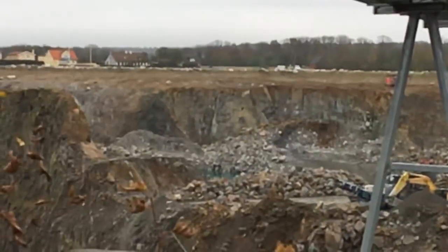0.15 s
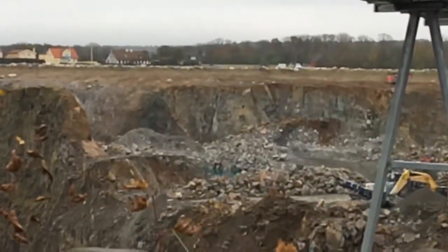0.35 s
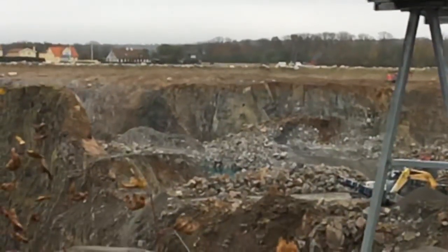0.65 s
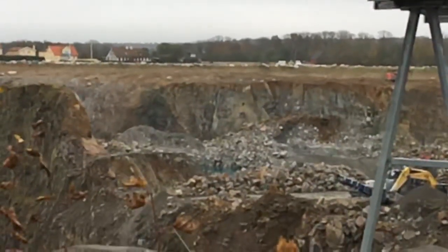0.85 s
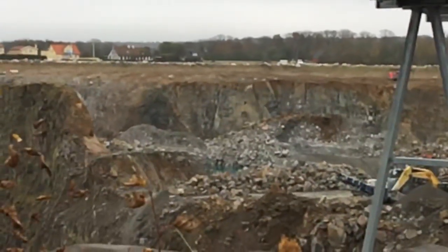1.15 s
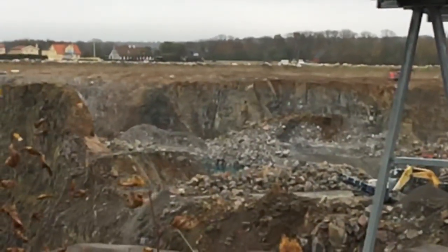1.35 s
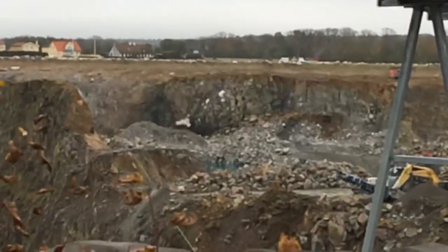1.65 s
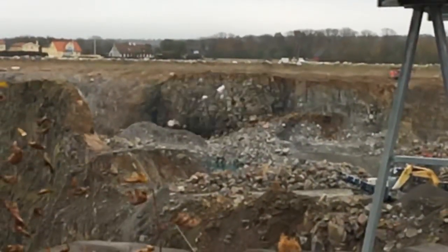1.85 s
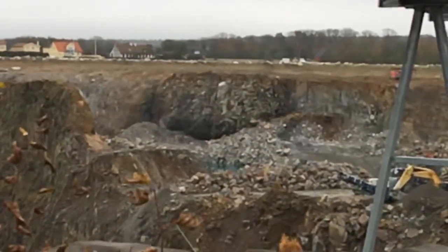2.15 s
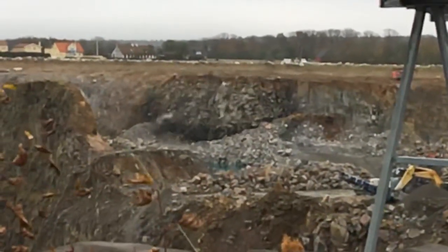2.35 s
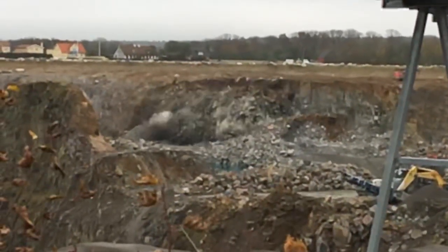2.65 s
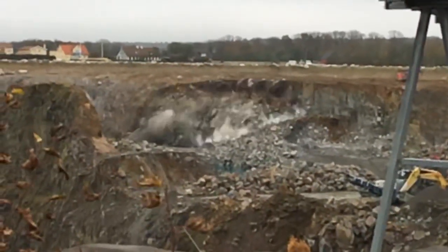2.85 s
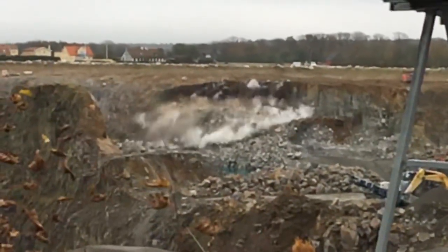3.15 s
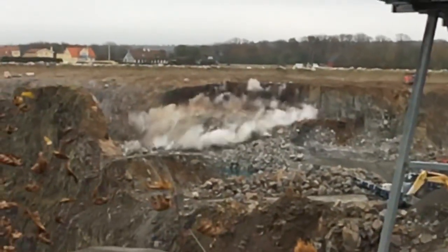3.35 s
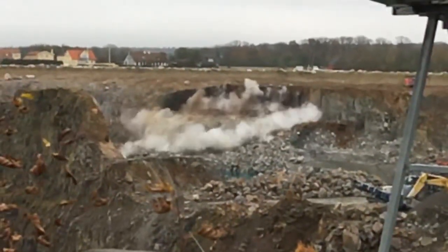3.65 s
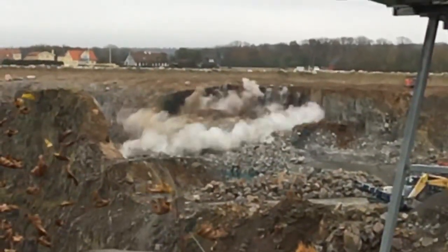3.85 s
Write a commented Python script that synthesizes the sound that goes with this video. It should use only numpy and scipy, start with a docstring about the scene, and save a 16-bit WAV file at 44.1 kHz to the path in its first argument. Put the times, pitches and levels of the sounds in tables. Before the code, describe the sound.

A quarry blast cracks sharply with a deep boom and rapid ripple of delayed charges, then rock rumbles and roars down; faint plant hum and a low ground tremor come before, heard from afar outdoors.

```python
"""A quarry face is blasted in the distance while machinery hums as shaped noise and a wavering tone.
The shock comes first through the ground as a low tremor of noise. Then the air brings a sharp crack,
made of noise bursts, a pressure jump and a low boom, and a quick ripple of delayed charges.
The face slumps with a lumpy rumble and breaks into a growing roar of rock, built from many short knocks.
The recorder overloads and ducks."""
import sys
import numpy as np
from scipy import signal
from scipy.fft import rfft, irfft
from scipy.io import wavfile
from scipy.ndimage import uniform_filter1d

SR = 44100
rng = np.random.default_rng(int(sys.argv[2]) if len(sys.argv) > 2 else 0)


def transcribe(u):
    """Save the signal u as a 16-bit wav file named by the first command-line argument.

    u: samples, shape (n,) or (channels, n), limited to [-1, 1]; the rate is SR.
    q: integer samples, one column per channel.
    """
    v = np.clip(np.atleast_2d(u).T, -1, 1)
    q = np.round(v * 32767).astype(np.int16)
    wavfile.write(sys.argv[1], SR, q)


N = 176400  # samples: 4 s
T = np.arange(N) / SR  # time of each sample [s]

# the crack and its nearest reflections: (time [s], level [dB])
CRACK_ARRIVALS = [(2.3112, -2.5), (2.316, -28), (2.3301, 3), (2.339, 1.5)]


def amp(db):
    """Turns decibels into gain."""
    return 10 ** (np.asarray(db) / 20)


def unit(x):
    """Scales a sound to an average (rms) strength of 1."""
    return x / np.sqrt(np.mean(x ** 2) + 1e-20)


def level(points):
    """Gain over time from (time [s], level [dB]) points, all but silent before the first."""
    return amp(np.interp(T, *np.transpose(points), left=-120))


def colour(x, points):
    """Filters x by (frequency [Hz], level [dB]) points, with less and less below the first; rms 1."""
    f, db = np.transpose(points)
    hz = np.fft.rfftfreq(N, 1 / SR)
    gain = amp(np.interp(np.log(hz + 1), np.log(f), db))
    low_cut = np.minimum(hz / f[0], 1) ** 2
    return unit(irfft(rfft(x) * gain * low_cut, N))


def noise(points):
    """Random hiss with a given spectrum, rms 1."""
    return colour(rng.standard_normal(N), points)


def decay(start, t60, rise=1e-4):
    """A straight rise, and an exponential fade that loses 60 dB in t60 seconds."""
    age = np.maximum(T - start, 0)
    return np.minimum(age / rise, 1) * np.exp(-np.log(1000) * age / t60)


def swing(start, hz, t60, rise):
    """A pressure wave: a push, a suck and a few dying swings."""
    return decay(start, t60, rise) * np.sin(2 * np.pi * hz * (T - start))


def machinery():
    """A distant plant: a steady wash, wavering drones and one clear whine whose pitch wanders."""
    # machinery and open air: (frequency [Hz], level per Hz [dB])
    plant = [(25, -17), (55, -9.5), (110, -5), (200, -6), (260, -10.5), (350, -12.5), (490, -20.5),
             (560, -14.5), (850, -13), (1050, -15.5), (1450, -23.5), (1700, -21), (2200, -26.5),
             (2750, -31), (3300, -36.5), (4200, -40), (6200, -39.5), (7500, -44), (16000, -48.5)]
    # machine tones: (frequency [Hz], level [dB], width [Hz])
    hum = [(173.1, -44, 8.9), (211.6, -49.5, 12), (709, -48.5, 52), (864, -58.5, 26), (962, -50.5, 20),
           (1110, -55.5, 19), (1281, -57.5, 23), (1563, -54, 80)]
    plant_db = -39.5
    whine_hz, whine_db, wander_hz = 681.7, -43.5, 2.2  # the wander is an rms value
    f = np.fft.rfftfreq(N, 1 / SR)
    out = amp(plant_db) * noise(plant)
    for hz, db, width in hum:
        # a narrow band of noise sounds like a wavering tone
        band = 1 / (1 + (2 * (f - hz) / width) ** 2)
        out += amp(db) * unit(irfft(rfft(rng.standard_normal(N)) * band, N))
    pitch = whine_hz + wander_hz * noise([(2, -6), (12, -5), (100, -69)])
    whine = unit(np.sin(2 * np.pi * np.cumsum(pitch) / SR))
    return out + amp(whine_db) * whine


def tremor():
    """The ground wave outruns the sound in the air: low noise that fades slowly."""
    # ground tremor: (frequency [Hz], level per Hz [dB])
    ground = [(20, -22.5), (45, 2.5), (90, -0.5), (125, -8.5), (200, -12), (500, -71)]
    start_s, tremor_db, fade_db_per_s = 1.425, -31, 7
    return amp(tremor_db) * decay(start_s, 60 / fade_db_per_s, 0.012) * noise(ground)


def crack():
    """The crack and its reflections, scatter off the ground, and a low ringing boom beneath."""
    # small sharp snaps just ahead of the crack: (time [s], level [dB])
    snaps = [(2.288, -18.5), (2.3015, -29)]
    # colour of the crack: (frequency [Hz], level per Hz [dB])
    crack_colour = [(100, -2), (170, 13.5), (260, -2), (450, 4.5), (680, -7), (1000, 2.5), (1400, -2),
                    (2000, -18.5), (3400, -15.5), (4500, -18), (5200, -25.5), (9000, -25), (14000, -26),
                    (16000, -33)]
    # hissing tail, scattered from rubble: (frequency [Hz], level per Hz [dB])
    echo_colour = [(1200, 5), (2500, 0), (4500, -8), (9000, -13.5), (15000, -20)]
    snap_t60, crack_t60 = 0.007, .016  # s
    scatter_db, scatter_t60 = -5, 0.23  # dB, s
    echo_db, echo_t60 = -23.5, 0.64  # dB, s
    boom_s, boom_hz, boom_db, boom_t60, boom_rise_s = 2.314, 63.2, 5.5, 0.41, 0.0029
    start = CRACK_ARRIVALS[0][0]
    # the bursts share one noise, so their powers add
    power = sum((amp(db) * decay(s, snap_t60)) ** 2 for s, db in snaps)
    power += sum((amp(db) * decay(s, crack_t60)) ** 2 for s, db in CRACK_ARRIVALS)
    power += (amp(scatter_db) * decay(start, scatter_t60)) ** 2
    burst = np.sqrt(power) * noise(crack_colour)
    tail = amp(echo_db) * decay(start, echo_t60, .02) * noise(echo_colour)
    boom = amp(boom_db) * swing(boom_s, boom_hz, boom_t60, boom_rise_s)
    return burst + tail + boom


def knocks(count=12):
    """Countless stones of random size strike, each with a short ring, over a blur of smaller ones."""
    knocks_per_s, spread_db, knock_t60 = 900, 1.5, 0.022  # t60 in s
    wash_share = 0.58  # share of the power in the blur
    t, out = T[:2048], np.zeros(N)
    # each round gives its share of the stones one random ring
    for _ in range(count):
        strikes = rng.random(N) < knocks_per_s / count / SR
        size = amp(spread_db * np.minimum(rng.exponential(1, N), 4)) * strikes
        ring = rng.standard_normal(len(t)) * np.exp(-np.log(1000) * t / knock_t60)
        out += signal.oaconvolve(size, ring)[:N]
    return np.sqrt(1 - wash_share) * unit(out) + np.sqrt(wash_share) * rng.standard_normal(N)


def rockfall():
    """The face rumbles in lumps as it slumps; light stones clatter first, then the heavy mass lands."""
    # loudness of the slumping face: (time [s], level [dB])
    slump = [(2.31, -50), (2.36, -7.5), (2.62, -14), (2.72, -14), (2.86, -22.5), (2.96, -16), (3.08, -25),
             (3.22, -20.5), (3.5, -24), (3.75, -26), (4, -28)]
    # colour of the slump: (frequency [Hz], level per Hz [dB])
    rumble_colour = [(18, -19), (34, -4), (68, -0.5), (110, -4.5), (170, -6), (240, -18), (500, -20.5),
                     (1500, -78)]
    # loudness of the falling rock: (time [s], level [dB])
    falling = [(2.4, -35), (2.7, -33), (2.85, -31.5), (3.0, -28), (3.2, -25.5), (3.45, -22), (3.65, -18.5),
               (3.88, -17), (4, -17)]
    # colour of the first stones: (frequency [Hz], level per Hz [dB])
    stone_colour = [(150, -29.5), (250, -1.5), (479, -5), (620, -2.5), (687, -6.5), (1040, -1),
                    (1230, -11.5), (1510, -6), (1650, -11.5), (3320, -18), (8100, -50), (15000, -83)]
    # colour as the mass lands: (frequency [Hz], level per Hz [dB])
    mass_colour = [(70, -1.5), (130, 3), (230, -4), (310, 1.5), (600, -3), (800, -3.5), (970, -2.5),
                   (1300, -6.5), (1500, -6), (1750, -9.5), (3300, -21), (5000, -31.5), (6400, -38),
                   (8000, -55.5), (15000, -93.5)]
    # how quick the uneven surges are: (frequency [Hz], level per Hz [dB])
    surge = [(4, 2.5), (15, -9), (40, -14.5), (120, -50)]
    surge_db, lump_db = 1.0, 2  # rms depth of the surges in the roar and the lumps in the slump
    mass_from_s, mass_full_s = 3.16, 3.74
    heavy = np.clip((T - mass_from_s) / (mass_full_s - mass_from_s), 0, 1)
    stones = colour(knocks() * amp(surge_db * noise(surge)), stone_colour)
    mass = colour(knocks() * amp(surge_db * noise(surge)), mass_colour)
    rumble = colour(rng.standard_normal(N) * amp(lump_db * noise(surge)), rumble_colour)
    roar = np.sqrt(1 - heavy) * stones + np.sqrt(heavy) * mass
    return level(falling) * roar + level(slump) * rumble


def front():
    """The shock front: a steep jump in pressure, then a suck, over in a few milliseconds."""
    front_db, front_s = 9, 0.00038  # front_s: time from the jump to the start of the suck
    u = np.maximum(T - CRACK_ARRIVALS[0][0], 0) / front_s
    return amp(front_db) * (u > 0) * (1 - u) * np.exp(-u)


def charges():
    """Each buried charge gives a low push and a dull burst that echoes round the pit."""
    # delayed charges along the face: (time [s], level [dB])
    shots = [(2.34, 3.5), (2.371, -4), (2.404, -2.5), (2.432, -9), (2.459, -7), (2.492, -6.5),
             (2.522, -5.5), (2.553, -7), (2.58, -6.5), (2.614, -3), (2.639, -3.5)]
    # colour of the bursts: (frequency [Hz], level per Hz [dB])
    shot_colour = [(60, -7), (170, 4), (250, -1), (340, 4.5), (470, -2.5), (600, -5), (800, -6.5),
                   (950, -1.5), (1220, -14), (1480, -12), (1650, -16.5), (3100, -27.5), (5000, -41),
                   (8000, -59.5), (16000, -67.5)]
    rise_s, burst_t60 = 0.0018, 0.059  # s
    echo_db, echo_t60 = -14.5, 0.41  # dB below the burst, s
    push_hz, push_db, push_t60, push_rise_s = 67.2, 9, 0.12, 0.0058  # push_db is above the burst
    power, push = np.zeros(N), np.zeros(N)
    for s, db in shots:
        burst = decay(s, burst_t60, rise_s)
        echo = amp(echo_db) * decay(s, echo_t60, 0.017)
        power += amp(db) ** 2 * (burst ** 2 + echo ** 2)
        push += amp(db + push_db) * swing(s, push_hz, push_t60, push_rise_s)
    return np.sqrt(power) * noise(shot_colour) + push


def microphone(x):
    """The microphone's colour: two dips in the treble, and a softer top."""
    # (frequency [Hz], level [dB])
    mic = [(4500, 0), (4950, -1.5), (5500, 1), (9500, -2.5), (10400, -6), (11300, -3.5)]
    f, db = np.transpose(mic)
    gain = amp(np.interp(np.fft.rfftfreq(N, 1 / SR), f, db))
    return irfft(rfft(x) * gain, N)


def scene():
    """Adds all sources at one microphone."""
    return (machinery() + tremor() + crack() + rockfall() + front() + charges())[None]


def record(dry):
    """Gain control ducks fast and recovers slowly; peaks overload softly; the top treble is cut."""
    threshold_db, squeeze = -13.5, 0.74  # squeeze: dB of ducking per dB over the threshold
    attack_s, recover_db_per_s = 0.016, 27.5
    ceiling, edge_hz = 1.05, 15750
    # average power of the last 10 ms
    power_db = 10 * np.log10(abs(uniform_filter1d(dry[0] ** 2, size=441, origin=220)) + 1e-12)
    # hold each peak, but let it sink at a steady rate
    sink_db = T * recover_db_per_s
    held_db = np.maximum.accumulate(power_db + sink_db) - sink_db
    over_db = np.maximum(held_db - threshold_db, 0)
    r = np.exp(-1 / (attack_s * SR))
    duck_db = squeeze * signal.lfilter([1 - r], [1, -r], over_db)
    ducked = microphone(dry) / amp(duck_db)
    limited = ceiling * np.tanh(ducked / ceiling)
    band_limit = signal.firwin(511, edge_hz, window=("kaiser", 9), fs=SR)
    return signal.oaconvolve(limited, band_limit[None], "same")


dry = scene()
out = record(dry)
transcribe(out)
```